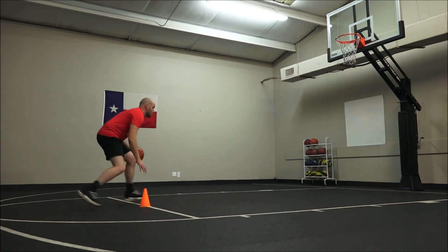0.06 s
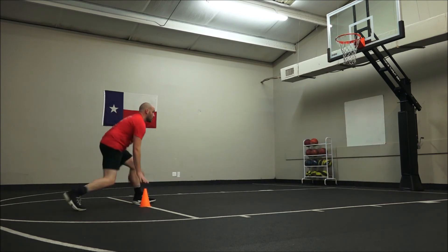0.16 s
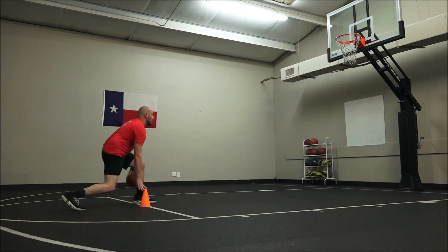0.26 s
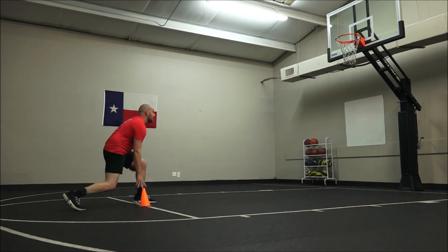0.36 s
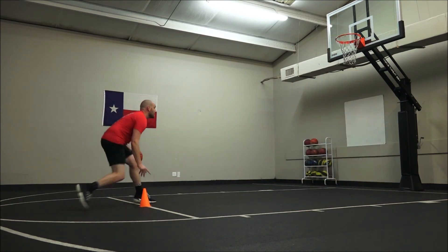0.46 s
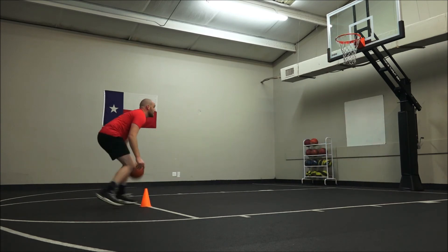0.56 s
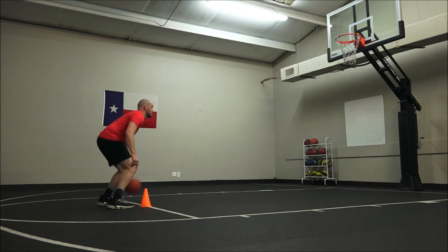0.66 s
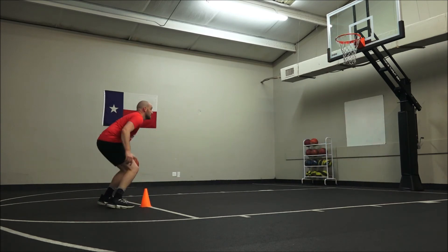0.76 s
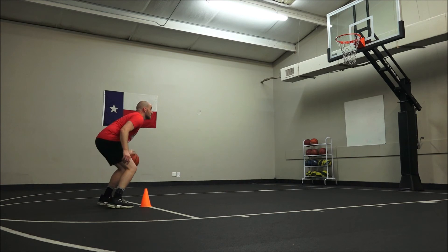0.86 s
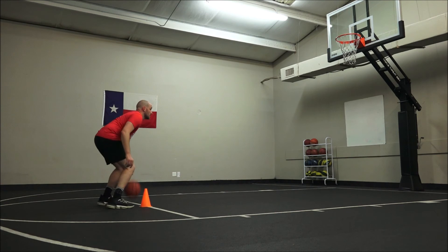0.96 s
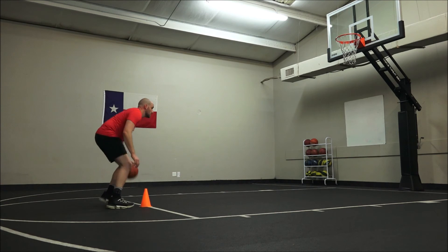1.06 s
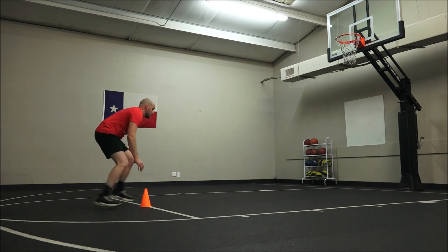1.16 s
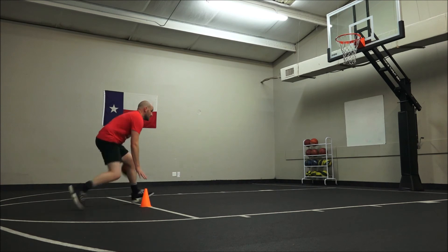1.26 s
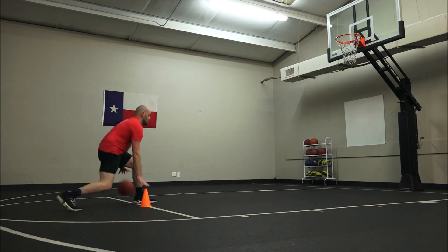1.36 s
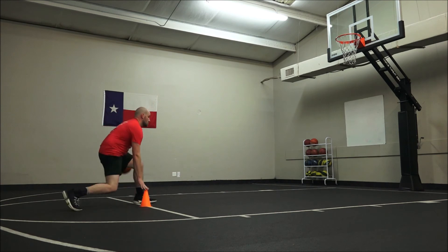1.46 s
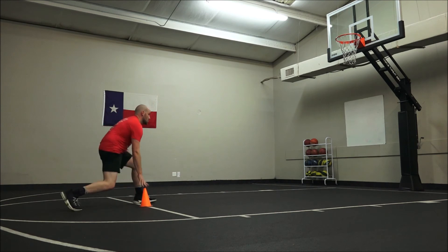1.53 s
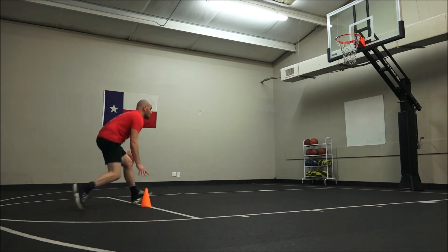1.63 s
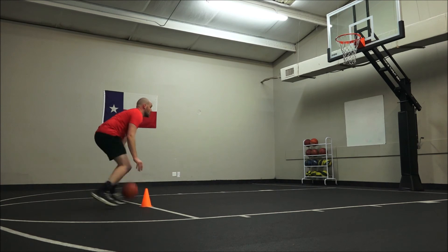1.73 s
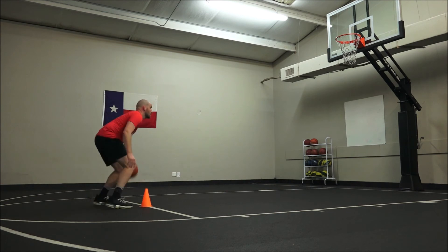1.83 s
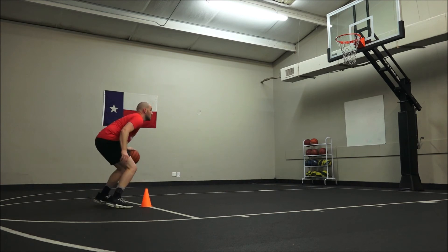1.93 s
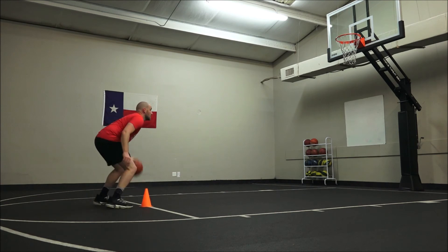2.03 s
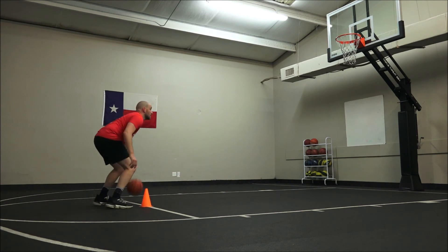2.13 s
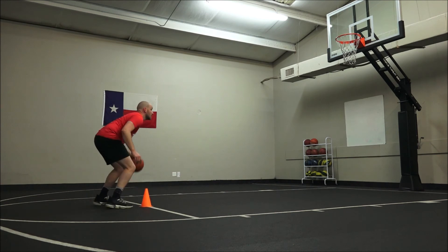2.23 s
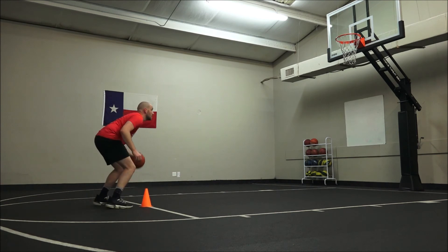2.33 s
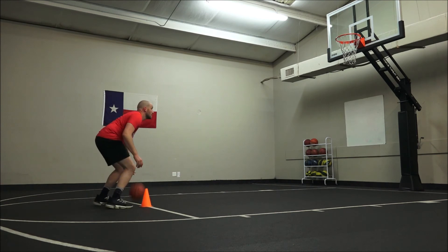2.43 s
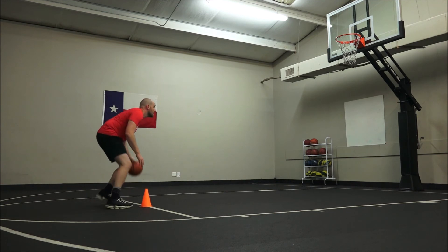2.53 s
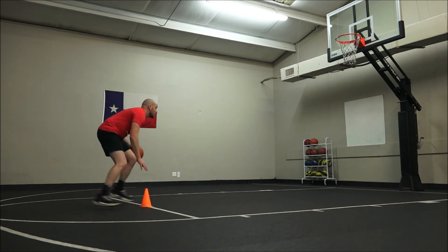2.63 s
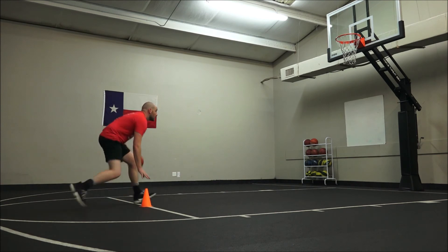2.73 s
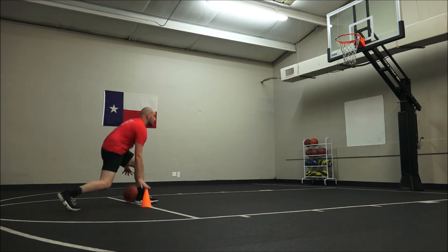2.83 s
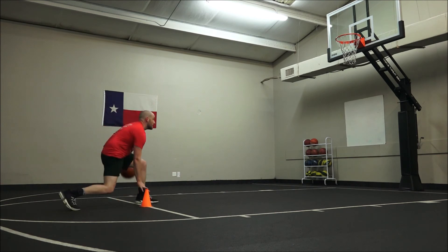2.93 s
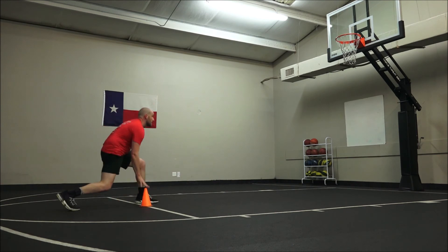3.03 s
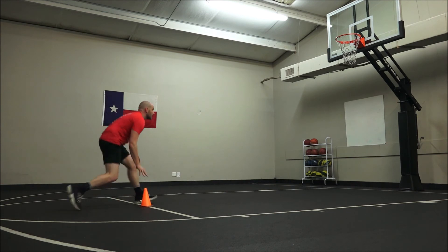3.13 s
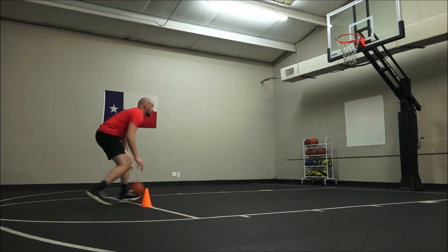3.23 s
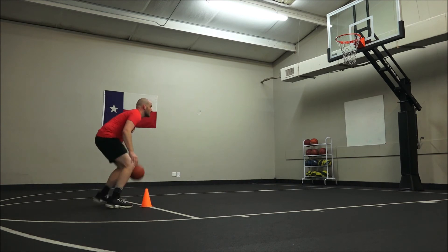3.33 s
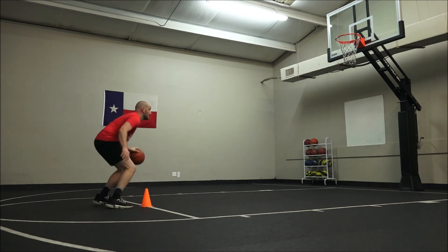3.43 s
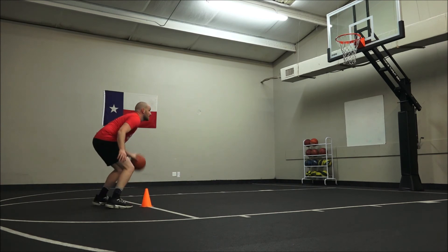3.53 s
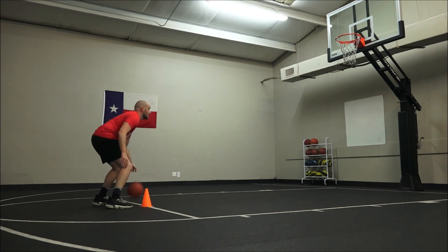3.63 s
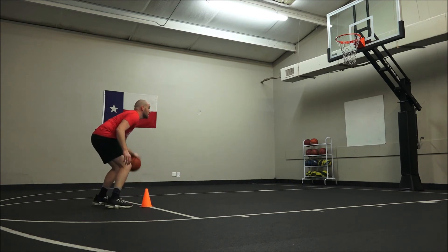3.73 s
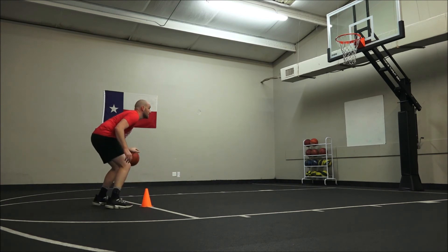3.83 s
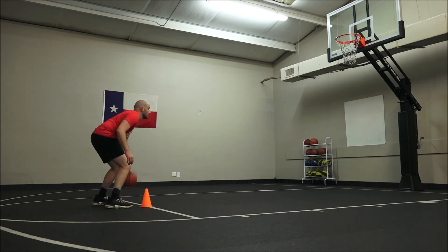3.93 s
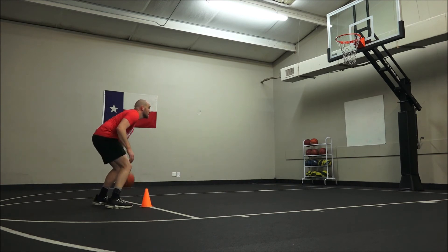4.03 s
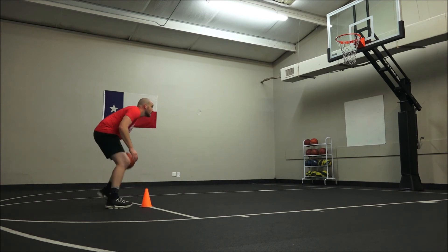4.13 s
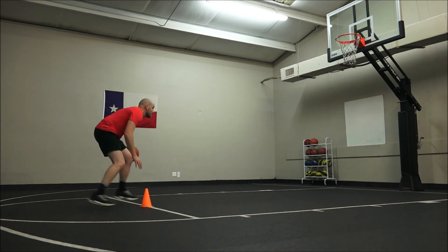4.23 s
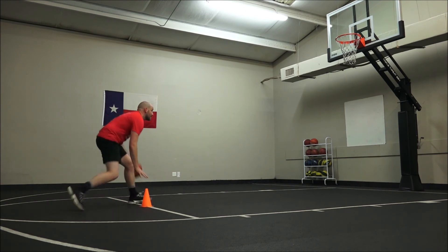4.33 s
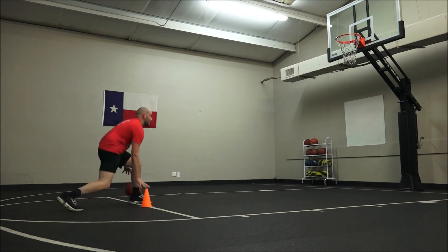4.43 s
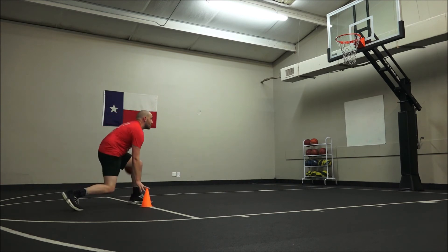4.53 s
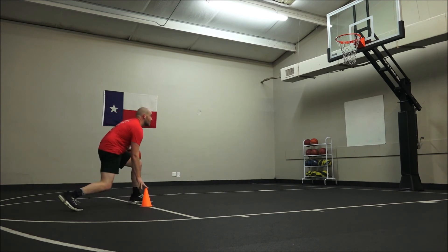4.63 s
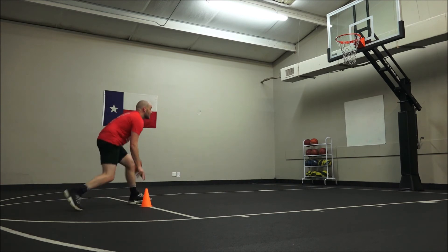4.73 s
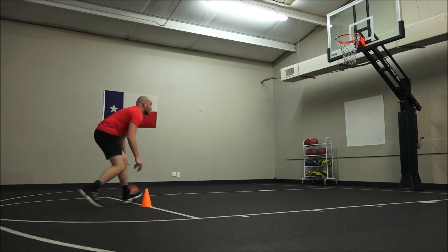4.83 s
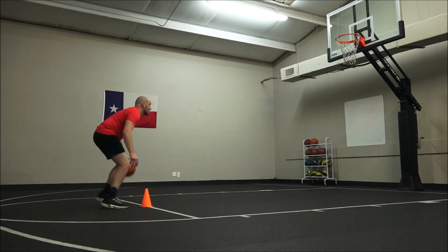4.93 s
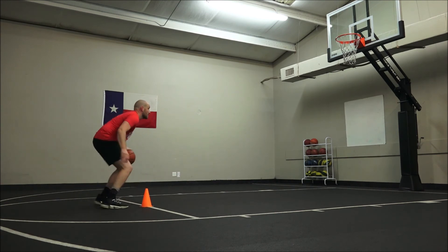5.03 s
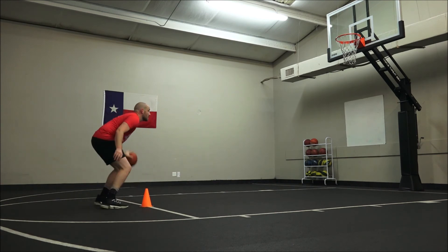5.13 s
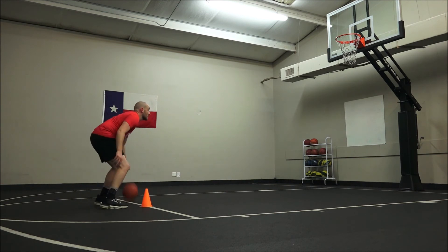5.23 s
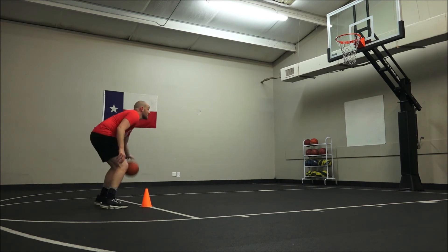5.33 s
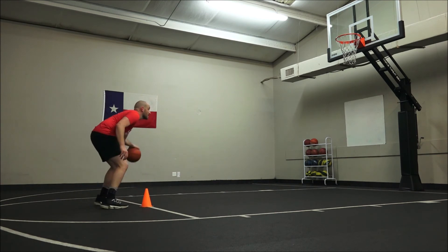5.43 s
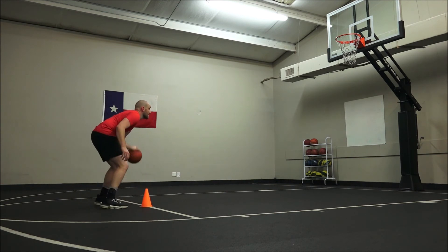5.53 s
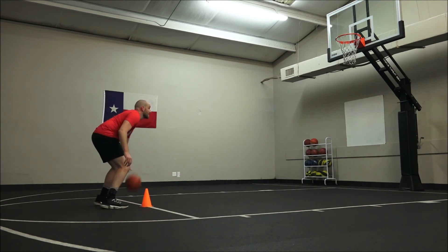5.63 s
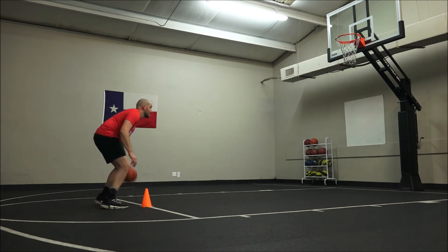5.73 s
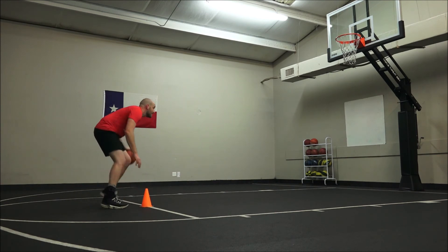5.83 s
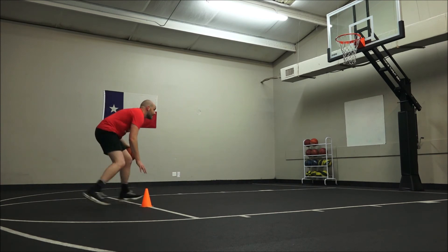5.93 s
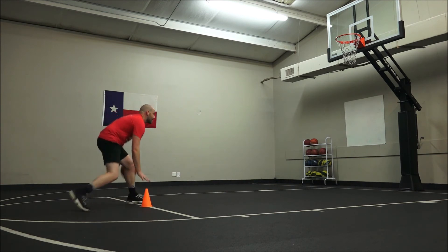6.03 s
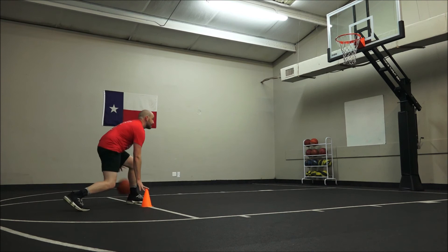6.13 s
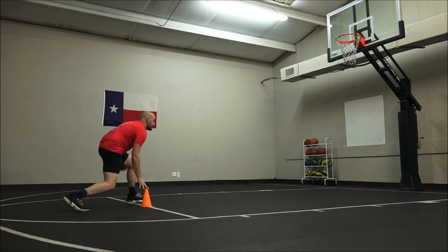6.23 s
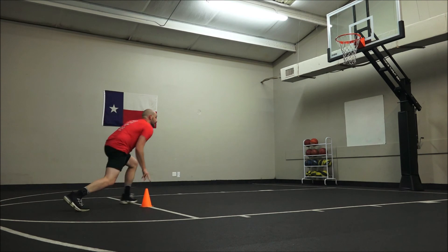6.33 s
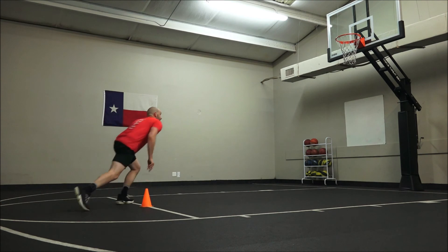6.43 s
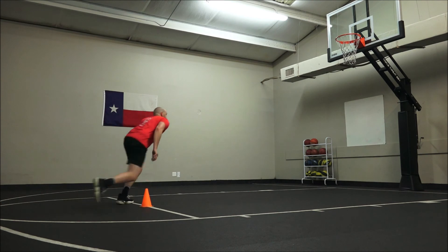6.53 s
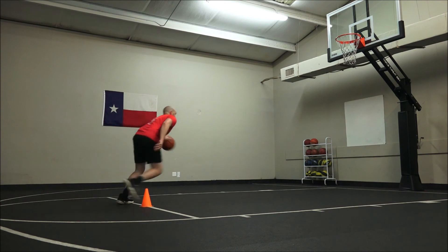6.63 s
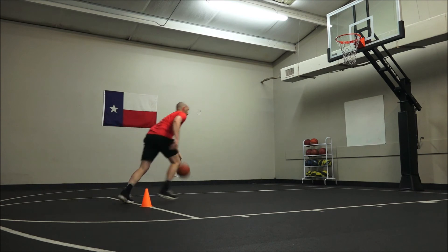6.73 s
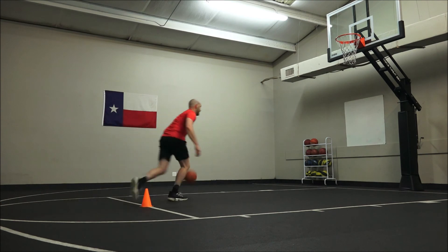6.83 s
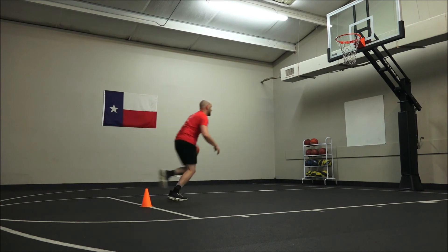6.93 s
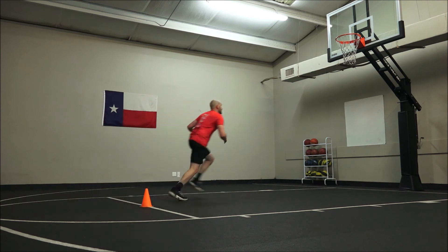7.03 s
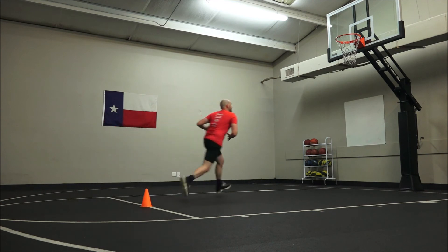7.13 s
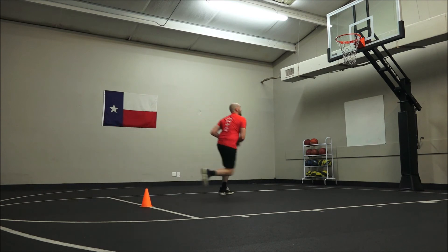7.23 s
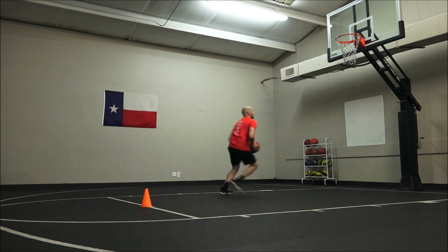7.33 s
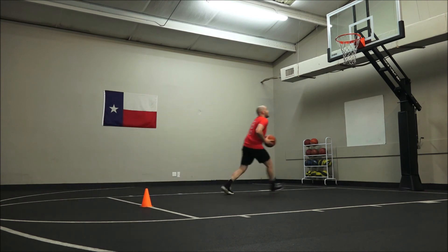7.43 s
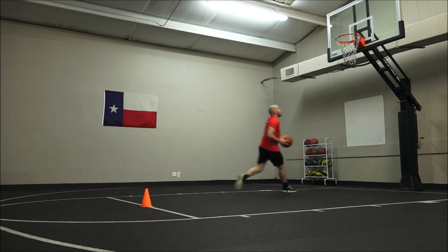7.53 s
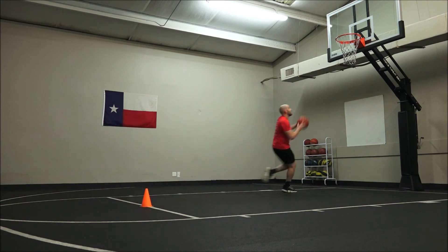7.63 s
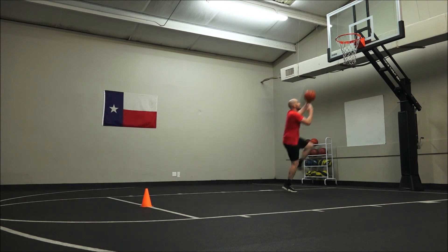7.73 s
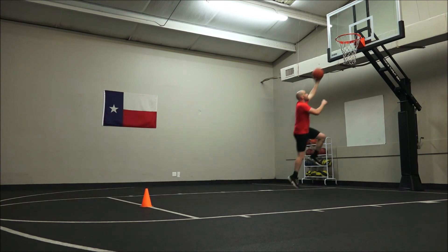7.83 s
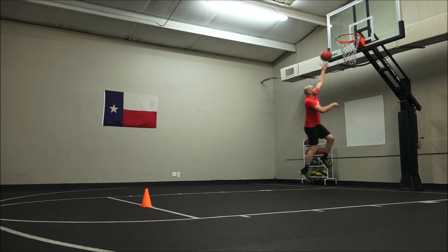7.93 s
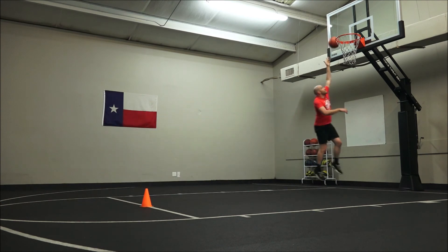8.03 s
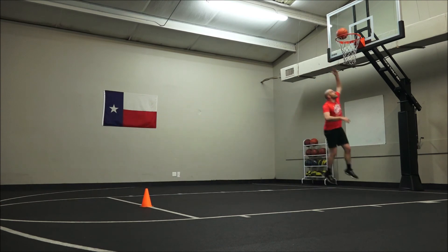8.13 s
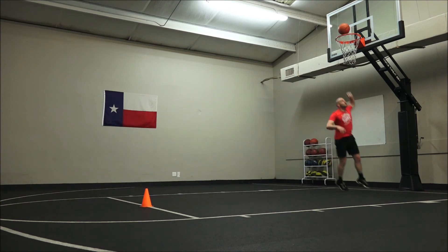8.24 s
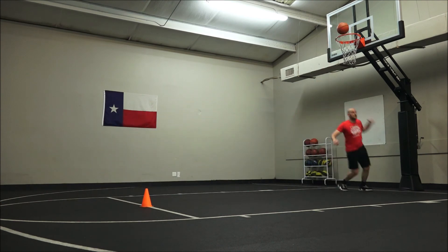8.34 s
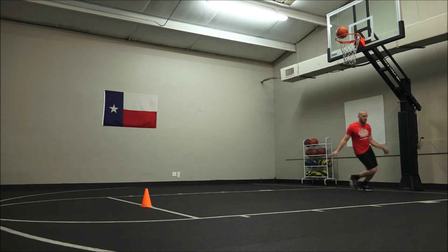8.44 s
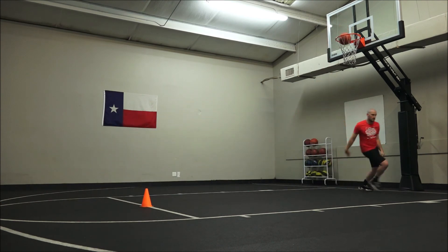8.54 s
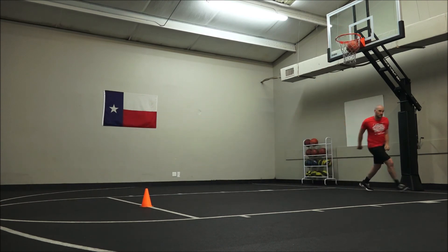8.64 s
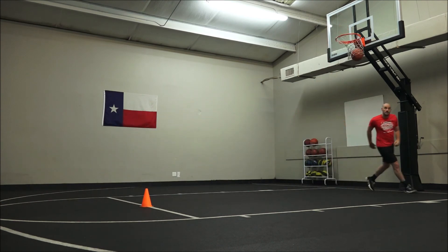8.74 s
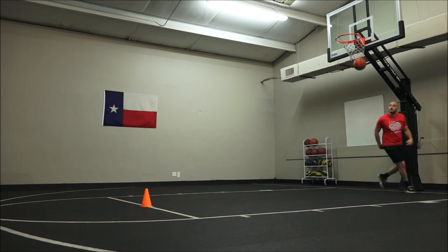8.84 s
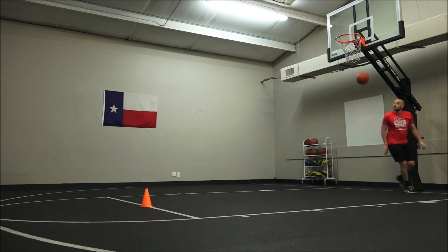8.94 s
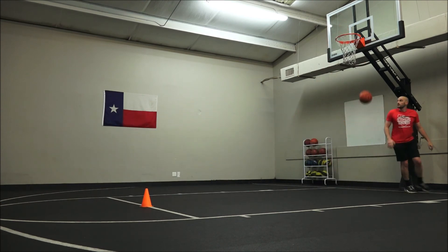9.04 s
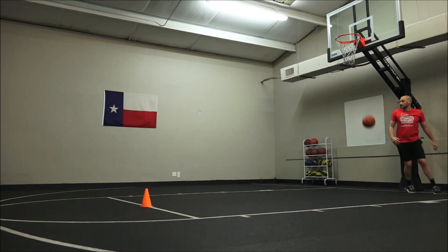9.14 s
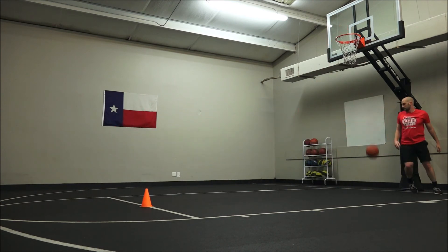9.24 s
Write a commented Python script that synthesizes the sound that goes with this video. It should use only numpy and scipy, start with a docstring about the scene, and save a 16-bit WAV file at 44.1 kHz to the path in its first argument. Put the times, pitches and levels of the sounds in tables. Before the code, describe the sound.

A basketball is dribbled quickly and evenly on a gym floor, each bounce a deep thump with a sharp slap and a ringing echo. Hands pat the ball and shoes scuff lightly. After a brief gap comes one last bounce, then running steps. The ball thuds against the backboard, shoes land, the rim rattles softly and the net swishes. The microphone picks up plenty of room sound and a faint ventilation hum.

```python
"""A bare gym, where a player dribbles a basketball fast, drives to the hoop and lays it in.
Each impact excites damped modes: ball and floor thump, the skin slaps, the enclosed air rings.
The walls reflect the sound, and standing waves and reverberation prolong it. Hands pat the ball,
shoes stamp and scuff, the backboard booms, the rim rattles and the net swishes over a faint hum."""
import sys
import numpy as np
from scipy import signal
from scipy.fft import rfft, irfft
from scipy.io import wavfile

SR = 44100
rng = np.random.default_rng(int(sys.argv[2]) if len(sys.argv) > 2 else 0)


def unload_wav(signal):
    """Save mono or channel-first audio to the path in sys.argv[1] as 16-bit WAV at rate SR, clipped to [-1, 1]."""
    wavfile.write(
        sys.argv[1],
        SR,
        np.round(np.clip(np.atleast_2d(signal).T, -1, 1) * 32767).astype(np.int16),
    )


N = 408807

# Ventilation: the airflow's spectrum and the fan's tones. Each row: frequency in Hz, level in dB.
AIRFLOW = [(25, -23), (60, -17), (150, -8), (400, -14), (1000, -9), (4000, -21), (9000, -28.5),
           (14000, -29.5)]
FAN_TONES = [(150.7, -59.5), (403.7, -74)]
# Early reflections, and the bass returned by walls and roof. Each row: delay in seconds, gain in dB.
EARLY_ECHOES = [(.0024, -8), (.0179, -12.5), (.0194, -11), (.0207, -13), (.0226, -12), (.0279, -13),
                (.0334, -14), (.037, -19)]
BASS_ECHOES = [(.0178, -16), (.0288, 2), (0.058, -13), (0.0839, -4), (0.097, -5.5), (0.1156, -6),
               (0.1583, -7), (0.198, -15), (0.244, -16.5)]
# Reverberation. Each row: frequency in Hz, t60 (the time to fall 60 dB) in seconds.
REVERB_TIMES = [(60, 3.4), (150, 1.57), (400, 1.75), (1000, 1.275), (2500, 1.63), (5000, 2.08),
                (9000, 0.95), (14000, 0.37)]
# Normal modes. Each row: frequency in Hz, level in dB, t60 in seconds.
HALL_MODES = [(82.4, -35, 1.1), (112, -49, 0.48), (141.7, -28, 0.77), (190, -32.5, 0.92), (213, -57, 0.99),
              (233.8, -36, 1.8), (305, -34.5, 0.49), (385.4, -48.5, 3.1), (399, -42, 2.4), (48, -47, 0.98),
              (57.9, -41, 0.85)]  # standing waves between the walls
MIDCOURT_MODES = [(91.5, -24.5, 0.42), (188.3, -14, .42), (212, -13, 0.4), (257, -28, 0.9)]  # standing waves that only the last bounce excites
BOARD_MODES = [(54, -26.5, 0.7), (71.1, -28.5, 0.66), (96, -49, .7), (131.3, -41.5, 2.7), (211, -43, 0.91)]  # the backboard and its stand
RIM_MODES = [(355, -38, .5), (1430, -52, .5), (2680, -46, .6), (3330, -50, .7), (3690, -51, .6)]  # the rim and its hooks
THUMP_MODES = [(106.4, -16, 0.15), (208.4, -19.5, 0.055), (64.6, -53, 0.11), (314, -28, 0.092)]  # ball and floor flexing together
CAVITY_MODES = [(909, -45, 0.12), (1246, -41, 0.15), (1700, -49, 0.14), (2019, -52, .14)]  # the air inside the ball
# Spectra of impacts and of friction. Each row: frequency in Hz, level in dB.
STAMP_SPECTRUM = [(40, -14), (130, -0.5), (250, -0.5), (480, 2), (800, -8.5), (1400, -12.5), (3000, -18),
                  (6000, -20.5), (10000, -45)]  # shoe striking floor
PAT_SPECTRUM = [(100, -12), (400, 5.5), (700, -12), (1000, -6.5), (1500, -7), (2200, -7.5), (3200, -14),
                (6000, -26), (10000, -48.5)]  # hand striking ball
BOARD_SPECTRUM = [(30, 2), (58, 24), (110, 17), (220, 18.5), (400, 2), (800, 0), (1400, 2), (2500, -4.5),
                  (5500, -4), (10000, -30), (14000, -26)]  # ball striking backboard
SLAP_SPECTRUM = [(30, -35), (55, -11), (90, 18), (200, 25.5), (390, 21.5), (520, 15), (680, 10.5),
                 (900, 17.5), (1300, 14.5), (2000, 15.5), (3000, 14), (5000, 8), (7500, -0.5),
                 (10000, -16.5), (12800, -12), (15500, -29)]  # ball striking floor
SOLE_SPECTRUM = [(200, -18), (600, 3), (1200, 14), (2500, -1.5), (5000, 2), (7500, -6.5), (10000, -17.5),
                 (14000, -14)]  # sole rubbing floor
NET_SPECTRUM = [(150, 9), (370, 9.5), (600, -4.5), (1400, 2.5), (2200, -3), (3400, 2), (6000, -6),
                (9500, -28), (14000, -25)]  # ball rubbing net
# Footfalls. Each row: start in seconds, level in dB, resonance of the sole in Hz.
STEPS = [(6.42, 2, 417), (7.221, 0.5, 258), (7.295, 10, 900), (7.57, 2.5, 950), (8.316, 11, 473),
         (8.368, 11.5, 520), (8.76, 1.5, 1150), (9.2094, 12.5, 760)]
# Sliding of soles and of ball in net. Each row: start in seconds, level in dB, length in seconds.
SCUFFS = [(.605, -41, 0.09), (.684, -31, 0.02), (6.41, -38, 0.048), (7.29, -41, 0.044),
          (7.575, -46.5, 0.11), (8.75, -40, 0.05), (9.21, -44, 0.053)]
SWISHES = [(8.562, -35, 0.06), (8.596, -37.5, 0.11), (8.74, -45, 0.08)]
# The hand meets the ball. Each row: start in seconds, level in dB.
PATS = [(.601, 2.5), (.666, 15.5), (1.69, -1), (2.8092, 3.5), (4.382, 9.5), (4.7034, 3.5), (6.055, 0),
        (6.09, 5)]
# The ball meets the floor. Each row: start in seconds, force in dB, bite (sharpness of contact) in dB,
# pitch of the pock (the struck skin's resonance) in Hz, height of that resonance in dB.
BOUNCES = [(-0.107, -2, -1.5, 1200, 4.5), (0.281, -.6, -.8, 1340, 9.8), (0.7026, -.6, 1.5, 2050, 3.6),
           (1.0513, .6, 1.9, 1540, 1.6), (1.4103, 2.8, -.1, 1260, 7), (1.815, -1.5, 1.3, 1125, 1.2),
           (2.1748, -1.3, -3.1, 1220, 4.9), (2.5114, 1, .2, 790, 3.8), (2.9083, -.9, 1.2, 1280, 5.7),
           (3.3178, -.9, -2, 1015, 3.4), (3.6887, 0, 1.3, 890, 2.8), (4.0493, -2, .1, 1480, 2.3),
           (4.4844, -2.3, 0, 1050, 2.6), (4.8995, 3, .4, 1440, 5), (5.3141, 1.5, -.5, 1380, 3.1),
           (5.739, .6, -1.6, 1560, 4.2), (6.178, 1.3, -.3, 1165, 7), (6.863, 2.7, -.6, 1390, 7)]
# Band centres of a bounce in Hz: body, slap, crack, sizzle.
BOUNCE_BANDS = [350, 1500, 4500, 12000]
# Stereo balance. Each row: frequency in Hz, left minus right in dB.
BALANCE = [(60, 1.5), (120, 4.2), (240, 0.9), (500, 0.5), (2000, 0.04), (12000, -0.6)]
# Stereo width. Each row: frequency in Hz, side minus mid in dB.
WIDTH = [(100, -27.5), (1000, -23.5), (3500, -49.5), (5500, -21), (8000, -3), (10000, 0), (12000, -25)]


def amp(db):
    """Amplitude ratio for a level in decibels."""
    return 10 ** (np.asarray(db) / 20)


def value_at(points, hz):
    """Interpolation of a table along a logarithmic frequency axis."""
    table_hz, value = np.transpose(points)
    return np.interp(np.log(hz + 1), np.log(table_hz), value)


def bins(size):
    """Frequencies in Hz of a real signal's Fourier transform."""
    return np.fft.rfftfreq(size, 1 / SR)


def add(mix, start, sound):
    """Superposition: a sound joins the mix at its start in seconds."""
    at = round(start * SR)
    sound = sound[max(-at, 0):]
    part = mix[max(at, 0):][:len(sound)]
    part += sound[:len(part)]


def noise(spectrum, size):
    """Spectral shaping: white noise is coloured and scaled to unit rms."""
    white = rfft(rng.standard_normal(size))
    coloured = irfft(white * amp(value_at(spectrum, bins(size))), size)
    return coloured / coloured.std()


def impulse(*spectra, size=4096):
    """Minimum phase: a causal click coloured by the sum of some spectra in dB."""
    hz = abs(np.fft.fftfreq(size, 1 / SR))
    log_gain = np.log(amp(sum(value_at(points, hz) for points in spectra)))
    return np.fft.ifft(np.exp(np.conj(signal.hilbert(log_gain)))).real


def resonance(centre_hz, db, octaves=0.42):
    """Resonance raises a hump in a spectrum, given as rows of Hz and dB."""
    hz = np.geomspace(30, SR / 2, 120)
    return np.c_[hz, db * np.exp(-(np.log2(hz / centre_hz) / octaves) ** 2)]


def ring(modes, size, phase_spread=0):
    """Free vibration: each mode is an exponentially damped sine."""
    t = np.arange(size) / SR
    return sum(amp(db - 60 * t / t60) * np.sin(2 * np.pi * (hz * t + phase_spread * rng.random()))
               for hz, db, t60 in modes)


def swelling_modes(start, modes, swell_s):
    """Resonant build-up: modes gather energy after a blow, then lose it to damping."""
    out = np.zeros(N)
    t = np.arange(SR) / SR
    add(out, start, ring(modes, len(t)) * (1 - np.exp(-t / swell_s)))
    return out


def disperse(sound, width_hz, count=14):
    """Dispersion: a rough contact delays random bands, as a chain of all-pass filters does."""
    radius = np.exp(-np.pi * width_hz / SR)
    for hz in np.geomspace(700, 13000, count) * rng.uniform(.8, 1.2, count):
        poles = [1, -2 * radius * np.cos(2 * np.pi * hz / SR), radius * radius]
        sound = signal.lfilter(poles[::-1], poles, sound)
    return sound


def ventilation():
    """Broadband flow noise and the steady tones of a fan make up the background."""
    t = np.arange(N) / SR
    hum = sum(amp(db) * np.sqrt(2) * np.sin(2 * np.pi * hz * t) for hz, db in FAN_TONES)
    return amp(-60) * noise(AIRFLOW, N) + hum


def echoes(paths, size):
    """Specular reflection: each path gives one delayed, scaled impulse."""
    taps = np.zeros(size)
    for delay, db in paths:
        add(taps, delay, amp([db]))
    return taps


def hall(sound, direct_db, first_wall_s, build_s=0.013, early_t60=0.69):
    """Reverberation: after the direct sound a diffuse field builds, drops fast and then lingers."""
    hz, t, spectrogram = signal.stft(rng.standard_normal(2 * SR), SR, nperseg=512)
    early = amp(1.5 - 60 * t / early_t60)
    late = amp(-4 - 60 * t / value_at(REVERB_TIMES, hz)[:, None])
    tail = signal.istft(spectrogram * np.hypot(late, early), SR, nperseg=512)[1]
    since_wall = np.maximum(np.arange(len(tail)) / SR - first_wall_s, 0)
    build_up = 1 - 0.75 * np.exp(-since_wall / build_s)  # starts as weak scatter from the floor
    tail *= build_up * np.sqrt(20 / SR)
    first_arrivals = amp(direct_db) * echoes([(0, -7)] + EARLY_ECHOES, len(tail))
    return signal.fftconvolve(sound, tail + first_arrivals)


def knocks(rows, spectrum, peak_db, direct_db, first_wall_s):
    """Impact excitation: short blows, each coloured by its own resonance, sound in the hall."""
    out = np.zeros(N)
    for start, db, hz in rows:
        click = impulse(spectrum, resonance(hz, peak_db))
        knock = amp(db) * disperse(click, width_hz=630)
        add(out, start, hall(knock, direct_db, first_wall_s))
    return out


def rubs(rows, spectrum, direct_db):
    """Sliding friction: bursts of noise catch at once and fade as the contact lets go."""
    out = np.zeros(N)
    for start, db, length in rows:
        size = int(length * SR)
        burst = amp(db) * noise(spectrum, size) * np.sqrt(np.linspace(1, 0, size))
        add(out, start, hall(burst, direct_db, first_wall_s=0.0078))
    return out


def pock(hz, db, t60=0.013):
    """Heavy damping: the ball's struck skin rings briefly and echoes off the nearest walls."""
    paths = echoes([(0.00037, -3.5)] + EARLY_ECHOES, size=2048)
    return amp(db) * signal.fftconvolve(ring([(hz, 0, t60)], size=1024), paths)


def shoes():
    """Impact and friction: soles stamp on the floor and slide along it."""
    stamps = knocks(STEPS, STAMP_SPECTRUM, peak_db=2.5, direct_db=-3.5, first_wall_s=0.0026)
    return stamps + rubs(SCUFFS, SOLE_SPECTRUM, direct_db=-3)


def hands(skin_hz=1340, skin_db=-26):
    """The impact of the palm excites a resonance of the ball's skin."""
    rows = [(start, db, skin_hz) for start, db in PATS]
    out = knocks(rows, PAT_SPECTRUM, peak_db=1, direct_db=-4.5, first_wall_s=0.0091)
    for start, db in PATS:
        add(out, start, pock(skin_hz, db + skin_db, t60=0.0064))
    return out


def layup():
    """Modes ring in turn in the hall, the backboard and the rim; friction sounds the net."""
    last_bounce = swelling_modes(6.863, MIDCOURT_MODES, swell_s=.035)  # builds as the echoes meet
    board = knocks([(8.239, -1.4, 1330)], BOARD_SPECTRUM,
                   peak_db=3.5, direct_db=-3.5, first_wall_s=0.00078)
    shudder = swelling_modes(8.262, BOARD_MODES, swell_s=.009)
    rattle = swelling_modes(8.568, RIM_MODES, swell_s=.02)
    net = rubs(SWISHES, NET_SPECTRUM, direct_db=1.5)
    return last_bounce + board + shudder + rattle + net


def contact_colour(force_db, bite_db, pock_db):
    """Contact sets the spectrum: force adds body, bite favours treble, a strong pock drains the slap."""
    slap_db = 5.8 + .46 * force_db - 1.4 * pock_db - 1.1 * bite_db
    crack_db = -1 + bite_db
    sizzle_db = 1 + .62 * force_db + 1.1 * bite_db
    return list(zip(BOUNCE_BANDS, [force_db, slap_db, crack_db, sizzle_db]))


def panel_ripple(depth_db=2, count=45):
    """Each blow meets a different panel, so the frequency response has small random peaks and dips."""
    return np.c_[np.geomspace(600, 14000, count), depth_db * rng.uniform(-1, 1, count)]


def floor_thump(size, low_cut_hz=56):
    """Coupled vibration: ball and floor flex together, and walls and roof reflect the bass."""
    paths = echoes([(0.0027, 0)] + BASS_ECHOES, size)
    thump = signal.fftconvolve(ring(THUMP_MODES, SR // 2), paths)[:size]
    return signal.sosfilt(signal.butter(4, low_cut_hz, "high", fs=SR, output="sos"), thump)


def dribble(contact_s=0.0018, swell_s=0.03, skin_db=-17):
    """Each impact radiates a slap and excites the modes of skin, enclosed air, floor and hall."""
    out = np.zeros(N)
    t = np.arange(2 * SR) / SR
    thump = floor_thump(len(t))
    standing_waves = ring(HALL_MODES, len(t), phase_spread=0.96) * (1 - np.exp(-t / swell_s))
    for start, force_db, bite_db, pock_hz, pock_db in BOUNCES:
        colour = contact_colour(force_db, bite_db, pock_db)
        # the patch of skin that lands colours the slap around its own pitch
        contact = impulse(colour, resonance(pock_hz, pock_db), panel_ripple())
        cavity = amp(-1 + 0.26 * pock_db) * ring(CAVITY_MODES, size=4096)
        slap = signal.fftconvolve(impulse(SLAP_SPECTRUM) + cavity, contact)
        slap = disperse(slap, width_hz=2200, count=7)
        add(out, start, hall(slap, direct_db=-3, first_wall_s=0.019))
        add(out, start, pock(pock_hz, skin_db + value_at(colour, pock_hz) + pock_db))
        bass = amp(-.8 + .35 * force_db) * thump + amp(force_db) * standing_waves
        add(out, start + contact_s, bass)
    return out


def scene():
    """The sources superpose in mid-side stereo: the bass leans left, random phase widens the top."""
    mid = rfft(dribble() + hands() + shoes() + layup() + ventilation(), 2 * N)
    hz = bins(2 * N)
    random_phase = np.angle(rfft(rng.standard_normal(640), 2 * N))
    side = mid * np.exp(1j * random_phase) * amp(value_at(WIDTH, hz))
    lean = amp(value_at(BALANCE, hz) / 2)
    return irfft(np.array([mid * lean + side, mid / lean - side]))[:, :N]


def record(dry, low_cut_hz=17, ceiling=.42, high_cut_hz=15700):
    """Band limiting removes rumble and the highest treble; soft saturation rounds the peaks."""
    dry = signal.sosfilt(signal.butter(2, low_cut_hz, "high", fs=SR, output="sos"), dry)
    rounded = dry / (1 + (dry / ceiling) ** 4) ** (1 / 4)
    low_pass = signal.firwin(255, high_cut_hz, window=("kaiser", 9), fs=SR)
    return signal.oaconvolve(rounded, low_pass[None], "same")


dry = scene()
out = record(dry)
unload_wav(out)
```